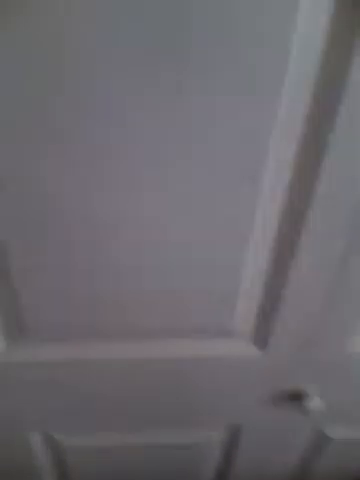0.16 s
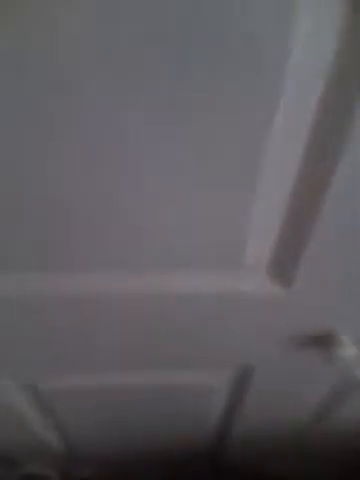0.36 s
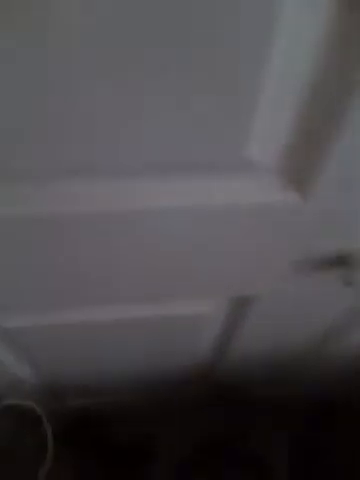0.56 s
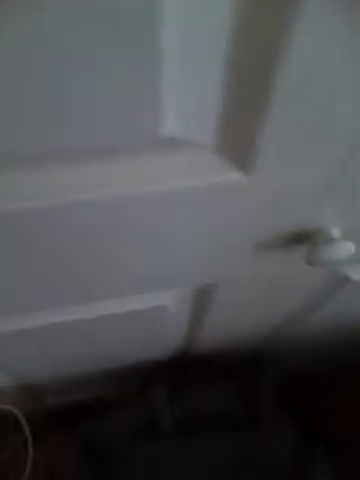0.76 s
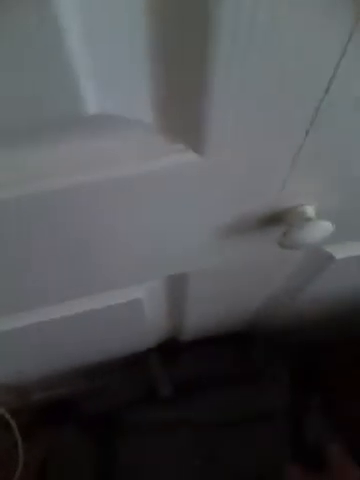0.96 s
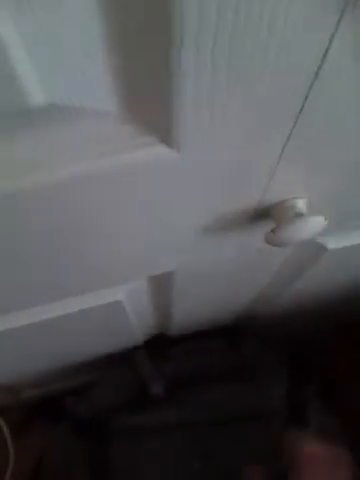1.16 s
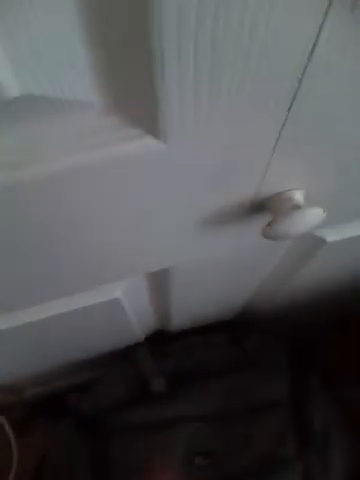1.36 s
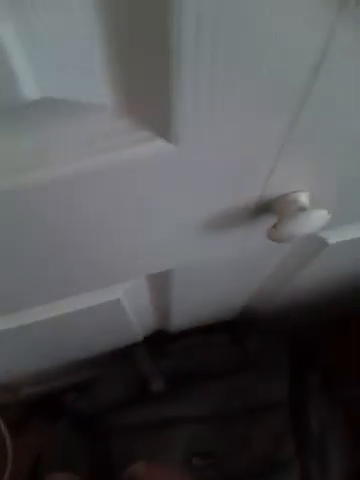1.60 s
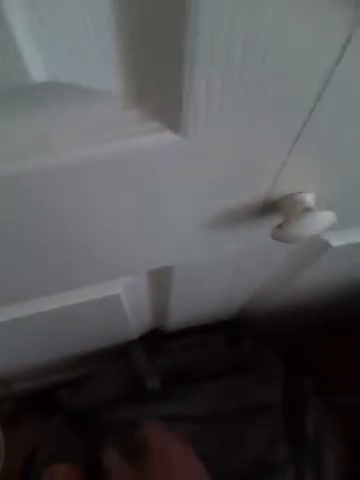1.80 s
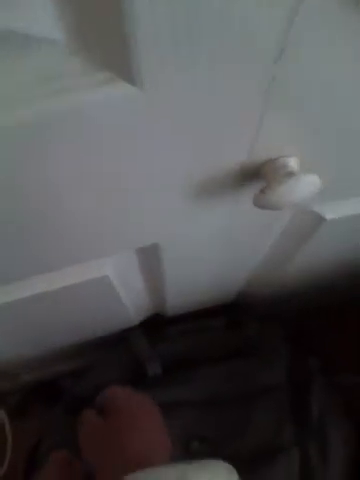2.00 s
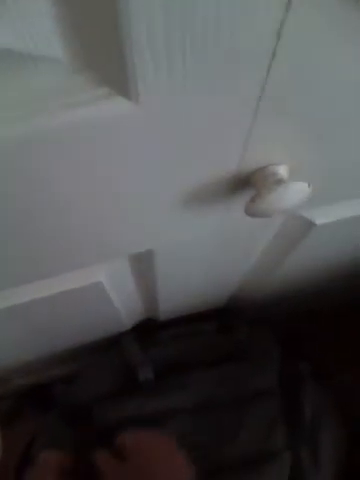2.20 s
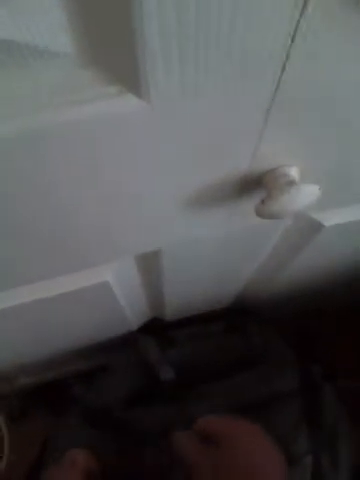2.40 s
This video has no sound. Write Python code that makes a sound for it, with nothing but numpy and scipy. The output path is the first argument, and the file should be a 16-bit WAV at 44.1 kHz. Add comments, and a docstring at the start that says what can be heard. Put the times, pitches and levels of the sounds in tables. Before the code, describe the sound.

Cloth bag handled close by, rustling and clicking, then fading to quiet and a quick scrape

```python
"""In a small quiet room, a fabric bag is rummaged through close to the microphone.
Cloth slides and crinkles in short strokes (coloured grains under swelling and fading force).
A hard thing knocks inside and a fastener snaps (damped modes and noise cracks), small fittings tick
(short noise bursts) and the bag bumps softly against the microphone (swelling low cycles).
At the end the cloth catches and slips in a quick run of tugs (scrapes and plucked modes)."""
import sys
import numpy as np
from scipy import signal
from scipy.fft import rfft, irfft, next_fast_len
from scipy.io import wavfile

SR = 44100
rng = np.random.default_rng(int(sys.argv[2]) if len(sys.argv) > 2 else 0)


def int16_out(signal):
    """Quantize to a 16-bit WAV file."""
    q = np.round(np.clip(np.atleast_2d(signal).T, -1, 1) * 32767)
    wavfile.write(sys.argv[1], SR, q.astype(np.int16))


N = 108045
T = np.arange(N) / SR

# colour of the noise at a hard contact or a scrape: (frequency [Hz], relative density [dB per Hz])
CRACK_COLOUR = [(50, -42), (200, -4.5), (900, 9), (2500, 2.5), (6500, -7), (10000, -15), (15500, -30.5)]


def from_db(db):
    """Decibels to gain."""
    return 10 ** (np.asarray(db) / 20)


def rms_one(x):
    """Scale to rms 1."""
    return x / np.sqrt(np.mean(x ** 2) + 1e-20)


def at_hz(points, hz):
    """Read a table on a log-frequency axis."""
    table_hz, values = np.transpose(points)
    return np.interp(np.log(np.maximum(hz, 1)), np.log(table_hz), values)


def coloured(x, colour):
    """Give a steady excitation a spectrum; rms 1."""
    size = next_fast_len(N)
    gain = from_db(at_hz(colour, np.fft.rfftfreq(size, 1 / SR)))
    return rms_one(irfft(rfft(x, size) * gain, size)[:N])


def noise(colour):
    """Steady noise of a given colour; rms 1."""
    return coloured(rng.standard_normal(N), colour)


def high_pass(x, order, hz):
    """Thin everything below a frequency."""
    return signal.sosfilt(signal.butter(order, hz, "high", fs=SR, output="sos"), x)


def dying(start, t60):
    """Envelope of a contact: a quick swell to its peak at start, then exponential decay."""
    rise_s = 0.0011
    age = T[:SR // 2] - 3 * rise_s
    # a swell cannot begin before zero: a start at 0 s peaks at 3.3 ms
    first = max(int((start + age[0]) * SR), 0)
    out = np.zeros(N + SR)
    out[first:first + len(age)] = np.exp(np.where(age < 0, 2 * age / rise_s, -np.log(1000) * age / t60))
    return out[:N]


def ring(start, modes):
    """Damped sines set off by one contact; as with bending waves, low modes set in later than high ones."""
    lag_cycles = 0.6
    tone = 0
    for k, (hz, db, t60) in enumerate(modes):
        age = np.maximum(T[:SR // 2] - start % (1 / SR) - lag_cycles / hz, 0)
        decay = np.exp(-np.log(1000) * age / t60)
        sign = (-1) ** k
        tone = tone + sign * from_db(db) * decay * np.sin(2 * np.pi * hz * age)
    return np.concatenate([np.zeros(int(start * SR)), tone, np.zeros(N)])[:N]


def brightened(modes, db, above_hz):
    """Raise or lower the modes above a frequency, as a harder or softer contact does."""
    return [(hz, level + db * (hz > above_hz), t60) for hz, level, t60 in modes]


def struck(contacts, modes, crack_db, crack_t60):
    """Every contact gives a brief crack and rings the modes; soft contacts lose the treble."""
    crack = from_db(crack_db) * noise(CRACK_COLOUR)
    out = np.zeros(N)
    for start, db, treble_db in contacts:
        rung = ring(start, brightened(modes, treble_db, above_hz=2000))
        cracked = from_db(treble_db) * crack * dying(start, crack_t60)
        out += from_db(db) * (rung + cracked)
    return out


def bass_thinned(x):
    """Thin everything below about 210 Hz."""
    return high_pass(x, 2, 210)


def background():
    """Room air and microphone hiss as one steady coloured noise, with a faint low hum."""
    # colour of air and hiss: (frequency [Hz], relative density [dB per Hz])
    air_colour = [(25, -5), (55, -7), (85, -6.5), (130, -5.5), (230, 0), (400, -2.5), (750, -2),
                  (1300, -9.5), (2300, -11), (3200, -9), (4000, -7), (4700, -16), (7000, -19.5),
                  (10000, -21.5), (15500, -21.5)]
    air_db, hum_db, hum_hz = -50.5, -61.5, 58.6   # rms levels
    hum = np.sqrt(2) * np.sin(2 * np.pi * hum_hz * T)
    return from_db(air_db) * noise(air_colour) + from_db(hum_db) * hum


def grains(rate, spread_db):
    """Random slips of fibres: clicks of either sign, of slightly uneven size."""
    sizes = from_db(spread_db * np.minimum(rng.exponential(1, N), 5))
    return (rng.random(N) < rate / SR) * sizes * rng.choice([-1, 1], N)


def drift(cutoff_hz):
    """Smooth random wander; rms 1."""
    return rms_one(signal.sosfilt(signal.butter(2, cutoff_hz, fs=SR, output="sos"), rng.standard_normal(N)))


def cloth():
    """Each stroke swells and fades: the bag's bulk shifts, cloth swishes, weave rasps and folds crinkle."""
    # strokes: (time of peak [s], rise [s], fall [s],
    #           bulk level [dB], swish level [dB], rasp level [dB], crinkle level [dB])
    strokes = [(.008, 0.1, 0.15, -32, -31, -37, -50), (0.254, 0.031, 0.036, -28.5, -38, -43, -44.5),
               (.335, 0.047, 0.09, -29.5, -47, -45, -49.5), (0.431, 0.047, 0.034, -30.5, -30, -39.5, -39),
               (.51, 0.045, 0.18, -43, -46.5, -47, -56.5), (.78, 0.079, 0.068, -35, -47, -51, -47),
               (.875, 0.028, 0.051, -43.5, -44.5, -50, -52.5), (1.08, 0.026, 0.084, -49, -50, -56, -51),
               (1.358, 0.042, 0.029, -50, -35, -46, -45.5), (1.41, 0.044, 0.13, -53.5, -51, -54.5, -63),
               (1.881, 0.035, 0.095, -59.5, -50, -59, -56.5), (2.16, 0.14, 0.066, -53.5, -50.5, -55, -54.5),
               (2.301, 0.11, 0.14, -46.5, -43, -48.5, -54)]
    # colours of the four parts: (frequency [Hz], relative density [dB per Hz])
    bulk_colour = [(40, -56), (90, -2.5), (170, 4.5), (340, 4.5), (550, -4), (900, -7), (2000, -13),
                   (6000, -78)]
    swish_colour = [(150, -13), (400, -6), (620, 1.5), (820, -7.5), (1170, 2.5), (1450, -8.5),
                    (1900, -16.5), (3200, -31), (8000, -48)]
    rasp_colour = [(700, -10.5), (1600, -7), (2100, -2.5), (2350, 1.5), (2620, -2), (3100, -12),
                   (5000, -16.5), (10000, -31.5)]
    crinkle_colour = [(300, -3), (1500, 5), (3200, -2.5), (4600, 1.5), (5600, -8.5), (6800, -2.5),
                      (9000, -9), (15500, -15.5)]
    grains_per_s, grain_spread_db = 4500, 0.5
    rough_db, rough_hz = 1.84, 64   # the level flutters as the cloth catches

    power = np.zeros((4, N))
    for peak, rise, fall, *levels in strokes:
        swell = np.exp(-((T - peak) / rise) ** 2)
        fade = np.exp(-(np.abs(T - peak) / fall) ** 1.4)
        shape = np.where(T < peak, swell, fade)
        power += (from_db(levels)[:, None] * shape) ** 2
    catching = rms_one(from_db(rough_db * drift(rough_hz)))
    colours = (bulk_colour, swish_colour, rasp_colour, crinkle_colour)
    parts = [coloured(grains(grains_per_s, grain_spread_db), colour) for colour in colours]
    return catching * np.sum(np.sqrt(power) * parts, axis=0)


def knock():
    """A hard thing rings at each contact, and the strongest contact shakes the stuffed bag around it."""
    # contacts: (time [s], level [dB], treble [dB])
    contacts = [(.2205, -10.5, -22), (.2275, 0, 5), (.2300, -7, -19), (.2346, -9.5, -14)]
    # the thing's modes, one value each: frequency [Hz], level [dB], decay t60 [s]
    mode_hz = [363, 533, 598, 797, 928, 1073, 1300, 1479, 1655, 1800, 2900, 4325, 4750, 6300]
    mode_db = [-17.5, -21, -24, -22.5, -10, -12.5, -18.5, -13, -22, -18, -25, -14.5, -23, -23.5]
    mode_t60 = [0.2, 0.063, .13, 0.18, 0.084, 0.066, 0.052, .06, 0.063, 0.11, .025, 0.018, 0.013, 0.0086]
    # colour of the bag's thud: (frequency [Hz], relative density [dB per Hz])
    thud_colour = [(40, -41), (120, -23), (300, 5), (750, 8.5), (1500, -4), (2100, -6.5), (4500, -18),
                   (12000, -45)]
    thud_db, thud_t60_s = -13.5, 0.067

    strongest = max(contacts, key=lambda row: row[1])[0]
    thud = from_db(thud_db) * noise(thud_colour) * dying(strongest, thud_t60_s)
    modes = list(zip(mode_hz, mode_db, mode_t60))
    return bass_thinned(struck(contacts, modes, crack_db=-18.5, crack_t60=0.012) + thud)


def ticks():
    """Small fittings clatter, short and damped; each has its own balance of parts and the lows last longest."""
    # ticks: (time [s], basic t60 [s], low level [dB], middle level [dB], high level [dB])
    tick_rows = [(0.297, 0.032, -37, -17.5, -28.5), (0.312, 0.018, -29, -16.5, -33),
                 (0.4078, 0.012, -48, -20.5, -33), (0.4252, 0.021, -36, -27, -54),
                 (0.4306, 0.014, -26.5, -26, -54), (0.5377, 0.02, -39.5, -26, -46),
                 (0.674, 0.026, -43, -36, -34), (0.7828, 0.013, -49, -29.5, -32.5),
                 (0.801, 0.029, -38, -26.5, -43), (.822, 0.02, -31.5, -36, -52),
                 (0.8865, 0.018, -43, -25, -34.5), (0.8889, 0.019, -25.5, -20, -38.5),
                 (0.9873, 0.022, -43, -37, -58), (1.0196, 0.024, -36.5, -32.5, -39.5),
                 (1.068, 0.013, -39.5, -49, -60), (1.465, 0.013, -50, -37.5, -65),
                 (1.7553, 0.02, -45, -55, -64), (1.85, 0.013, -36, -41.5, -56),
                 (1.8924, .035, -50, -41.5, -53)]
    # decay of the low, middle and high part: (multiple of the basic t60 [ratio])
    linger = [1.52, 0.73, 0.76]
    # colours of the three parts: (frequency [Hz], relative density [dB per Hz])
    low_colour = [(40, -32), (110, -33), (250, 1), (550, -8), (1000, -10), (3000, -57)]
    middle_colour = [(300, -56), (900, 0), (1350, 2.5), (1900, -6), (2800, -6.5), (4500, -15), (9000, -55)]
    high_colour = [(1500, -54), (4300, 7.5), (7000, 0), (9500, -4.5), (15500, -15)]

    parts = [noise(colour) for colour in (low_colour, middle_colour, high_colour)]
    out = np.zeros(N)
    for start, t60, *levels in tick_rows:
        for db, part, stretch in zip(levels, parts, linger):
            out += from_db(db) * part * dying(start, t60 * stretch)
    return out


def bumps():
    """The bag pushes softly on the microphone: low cycles that swell and die, with no deep bass."""
    # bumps: (time of peak [s], level [dB], frequency [Hz], half length [s])
    bump_rows = [(0.381, -1.5, 177, 0.0049), (.4025, -5.5, 162.3, 0.009), (0.426, -16, 184, 0.002),
                 (.994, -36.5, 196, 0.0084)]
    lowest_hz = 97
    pushes = np.zeros(N)
    for peak, db, hz, length in bump_rows:
        swell = np.exp(-((T - peak) / length) ** 2)
        pushes += from_db(db) * swell * np.cos(2 * np.pi * hz * (T - peak))
    # filtered both ways, so the swell stays centred on its peak
    return signal.sosfiltfilt(signal.butter(4, lowest_hz, "high", fs=SR, output="sos"), pushes)


def snap():
    """A fastener snaps: its quick contacts crack and ring its small hard parts."""
    # contacts: (time [s], level [dB], treble [dB])
    contacts = [(.6952, -20.5, -12), (.7093, 0.5, 1), (.7111, -11, -19)]
    # the fastener's modes: (frequency [Hz], level [dB], decay t60 [s])
    modes = [(915, -23.5, 0.09), (1343, -12, 0.022), (2240, -17.5, 0.011), (3050, -23.5, 0.019),
             (4280, -25, .014), (5100, -22.5, 0.014), (6200, -17.5, 0.011), (7080, -15.5, 0.0092),
             (8300, -22, 0.0064), (11000, -37, 0.011)]
    return bass_thinned(struck(contacts, modes, crack_db=-20.5, crack_t60=0.017))


def tugs():
    """Cloth catches and slips: each slip scrapes and plucks the taut cloth, a little differently every time."""
    # slips: (time [s], level [dB], brightness [dB])
    slips = [(2.2401, -45.5, 12), (2.2595, -47, 14), (2.278, -25, -16), (2.2993, -26, 3),
             (2.3152, -18.5, -0.5), (2.3258, -21, -3.5), (2.3345, -50, -8), (2.346, -36, -1),
             (2.359, -30.5, -2), (2.3738, -22.5, -3.5)]
    # modes of the taut cloth: (highest frequency [Hz], level [dB], decay t60 [s])
    modes = [(510, 2.5, 0.012), (1140, -8.5, 0.011), (2260, -5, 0.013), (4300, -20, 0.0088)]
    scrape_db, scrape_t60_s = -10, 0.014

    scrape = from_db(scrape_db) * noise(CRACK_COLOUR)
    out = np.zeros(N)
    for start, db, bright_db in slips:
        plucked = [(hz * rng.uniform(0.96, 1.0), level, t60)
                   for hz, level, t60 in brightened(modes, bright_db, above_hz=900)]
        out += from_db(db) * ring(start, plucked)
        out += from_db(db + bright_db) * scrape * dying(start, scrape_t60_s)
    return bass_thinned(out)


def room(x):
    """Dense early reflections and a longer tail: bands of noise, each with its own level and decay."""
    # colour of the reverberation: (frequency [Hz], level [dB])
    room_colour = [(100, 6), (350, 11), (1200, 1), (2500, -0.5), (4500, -9.5), (7000, -15), (15000, -2)]
    # decay of the tail: (frequency [Hz], t60 [s])
    tail_t60 = [(200, 0.58), (1200, 0.22), (4000, 0.86), (12000, 0.38)]
    early_t60_s, early_gain = 0.081, 2.1   # gain relative to the tail

    edges = np.geomspace(70, 16000, 11)
    response = 0
    for low, high in zip(edges, edges[1:]):
        hz = np.sqrt(low * high)
        band_pass = signal.butter(2, [low, high], "band", fs=SR, output="sos")
        band = signal.sosfilt(band_pass, rng.standard_normal(N))
        decay = dying(0, at_hz(tail_t60, hz)) + early_gain * dying(0, early_t60_s)
        response = response + band * from_db(at_hz(room_colour, hz)) * decay
    response = response[:SR // 2] / np.sqrt(np.sum(response ** 2))
    return 2 * signal.fftconvolve(x, response)[:N]


def scene():
    """The bag and its contents close by, with the hits answered by the room."""
    hits = np.array([knock(), ticks(), bumps(), snap(), tugs()])
    sends = from_db([-16, -15, -35, -15, -23])   # into the room, in the same order; room() doubles them
    return (hits.sum(axis=0) + room(sends @ hits) + cloth() + background())[None]


def record(dry):
    """The microphone thins the deep bass, peaks stop at full scale, the top is cut."""
    thin = high_pass(dry, 1, 30)
    top_cut = signal.ellip(10, .1, 70, 15900, fs=SR, output="sos")   # above 15.9 kHz
    return signal.sosfilt(top_cut, np.clip(thin, -1, 1))


dry = scene()
out = record(dry)
int16_out(out)
```